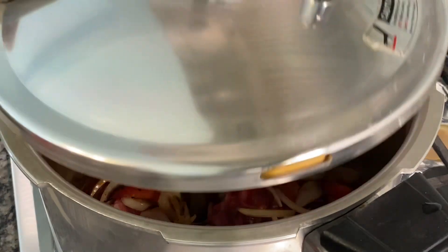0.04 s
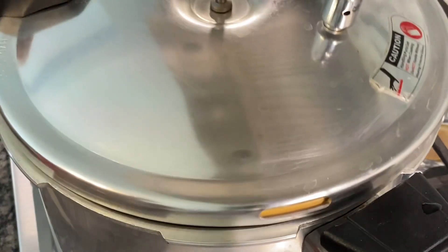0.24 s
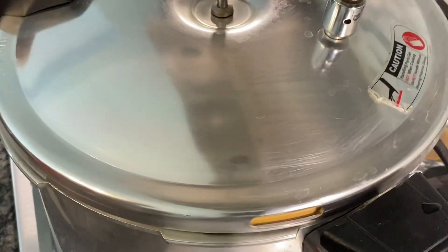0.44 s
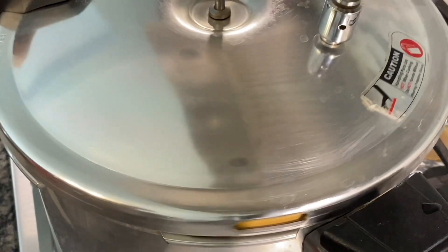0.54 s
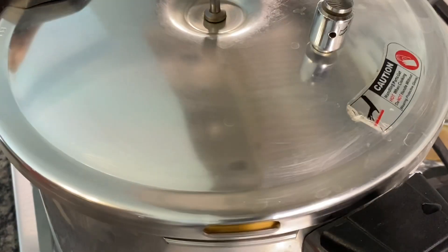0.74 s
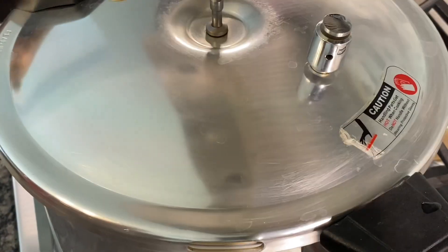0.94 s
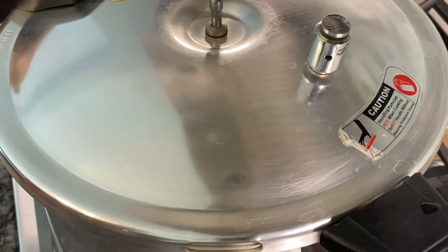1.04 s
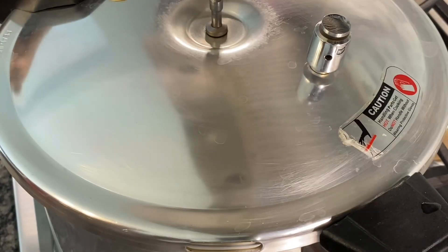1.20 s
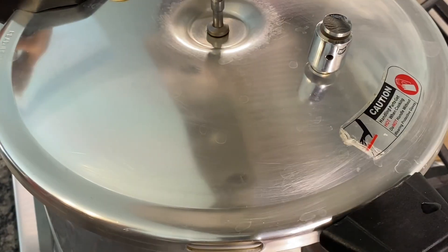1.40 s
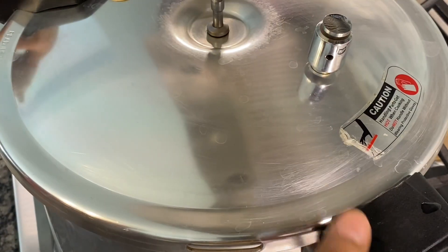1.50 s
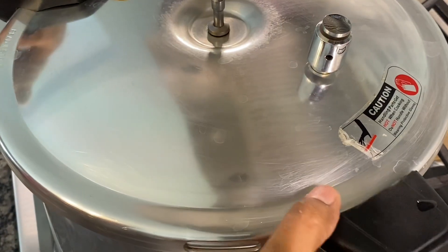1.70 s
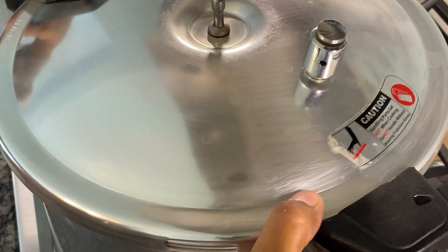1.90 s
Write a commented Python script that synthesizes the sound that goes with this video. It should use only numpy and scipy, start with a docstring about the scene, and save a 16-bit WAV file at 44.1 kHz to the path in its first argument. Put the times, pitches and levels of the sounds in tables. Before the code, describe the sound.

Close stereo pickup of a metal pot lid being closed: one hard double clank, softer knocks and sliding scrape, a cluster of clanks with low thuds, then quiet hiss and a muted knock, in a lightly reverberant kitchen.

```python
"""A heavy metal lid is set on a full pot, slid and twisted shut close to a phone in a kitchen.
The first knocks ring the lid's modes and the pot's boom; then the rim scrapes, a loose part jingles,
and further knocks come with stove-top thuds as the lid is worked shut.
Afterwards filtered noise hisses as air from the seal, a catch ticks and the locked lid is knocked again.
A diffuse room tail follows the near sounds, and low kitchen noise lies under everything."""
import sys
import numpy as np
from scipy import signal
from scipy.fft import rfft, irfft
from scipy.io import wavfile
from scipy.ndimage import uniform_filter1d

SR = 44100
rng = np.random.default_rng(int(sys.argv[2]) if len(sys.argv) > 2 else 0)


def unload_audio(sound):
    """Save the sound as a 16-bit wav file, at the path given as the first command line argument."""
    columns = np.transpose(np.atleast_2d(sound))
    # keep every value between -1 and 1, then stretch to whole-number steps
    steps = np.round(np.clip(columns, -1, 1) * 32767)
    wavfile.write(sys.argv[1], SR, steps.astype(np.int16))


N = 85995
T = np.arange(N) / SR
BLOW = np.sqrt(SR / 100)  # amplitude of a one-sample blow at 0 dB
LOCKED_S = 1.6  # from here on the lid is locked


def undb(db):
    """Decibels to gain."""
    return 10 ** (np.asarray(db, float) / 20)


def unit(x):
    """Scale to rms 1."""
    return x / np.sqrt(np.mean(x ** 2))


def curve(rows, column=1):
    """Draw one column of a table as a line in time, silent outside its ends."""
    rows = np.array(rows, float)
    return np.interp(T, rows[:, 0], rows[:, column], left=-120, right=-120)


def colour(x, points):
    """Filter by (f/Hz, level/dB) points joined along log frequency."""
    points = np.array(points, float)
    hz = np.fft.rfftfreq(x.shape[-1], 1 / SR) + 1
    level_db = np.interp(np.log(hz), np.log(points[:, 0]), points[:, 1])
    return irfft(rfft(x) * undb(level_db), x.shape[-1])


def band(x, lo_hz, hi_hz):
    """Band-pass."""
    sos = signal.butter(2, [lo_hz, min(hi_hz, .45 * SR)], "band", fs=SR, output="sos")
    return signal.sosfilt(sos, x)


def ring(x, modes):
    """Sum of exponentially decaying modes (f/Hz, level/dB, t60/s) driven by x."""
    out = 0
    for hz, db, t60 in modes:
        pole = np.exp((2j * np.pi * hz - np.log(1000) / t60) / SR)
        out = out + undb(db) * signal.lfilter([1], [1, -pole], x).imag
    return out


def linger(x, noise, t60):
    """Noise that takes up the energy of x and dies away over t60."""
    keep = np.exp(-2 * np.log(1000) / t60 / SR)
    energy = signal.lfilter([1 - keep], [1, -keep], x ** 2)
    return unit(noise) * np.sqrt(energy)


def lid():
    """Knocks and scraping drive the bands, knocks and rumble the boom, late knocks the shut note."""
    force, blows = knock_forces(scrape())
    return pot_boom() + shut_note(blows[1]) + lid_bands(force, blows)


# knocks of lid on pot: t/s, then the drive of each part: clank level/dB, boom level/dB,
# body level/dB, middle level/dB, treble level/dB; last the decay constant of the chatter/ms (0.3 at least)
KNOCKS = [(0.2406, -9, -46, -22.5, -27, -26, 2.6), (.2437, -3.5, -18, -8, -19, -21, 1.94),
          (0.361, -28, -25, -28, -28.5, -37, 4.5), (0.3988, -33.5, -26.5, -19, -34.5, -36.5, 3),
          (0.428, -39.5, -21, -25.5, -36, -45, 4.8), (0.567, -41, -22, -24.5, -30.5, -41, 4.3),
          (0.584, -40, -24.5, -20.5, -30, -41, 6), (0.5962, -37.5, -32, -24, -33.5, -52, 1.4),
          (0.6354, -12.5, -25, -21.5, -26, -25.5, 7.4), (0.654, -31, -29, -17, -32.5, -33.5, 4.7),
          (0.7634, -28, -15.5, -19.5, -28, -35, 22), (0.7717, -17.5, -19, -20, -20.5, -18, 3.7),
          (0.7745, -11.5, -16, -13, -19, -17.5, 2), (0.8, -21.5, -38, -35, -37.5, -32, 16),
          (0.8204, -5, -13, -9.5, -19.5, -13.5, 5.6), (0.8461, -13.5, -19, -41, -33.5, -27.5, 18),
          (0.8672, -12.5, -18, -34.5, -33.5, -20, 3.7), (1.6673, -15.5, -45, -45, -32.5, -28, 3.2),
          (1.683, -40, -20, -43.5, -41.5, -52, 2.4), (1.6912, -38, -33, -37.5, -32, -49, 4),
          (1.716, -55, -24.5, -61, -74, -68, 3)]
# scrape drive into body, middle, clank, treble: level/dB
SCRAPE_BANDS = [8, -1.5, -6, -4.5]
RISE_MS = .4


def knock_forces(scraping):
    """Each knock is one blow to the modes but a chattering noise burst to the cracks above the body."""
    age_ms = np.arange(SR // 20) / SR * 1000
    force = np.outer(undb(SCRAPE_BANDS), scraping)  # drives the cracks
    blows = force.copy()  # drives the modes
    for s, clank, _, body, middle, treble, decay_ms in KNOCKS:
        i = int(s * SR)
        span = slice(i, i + len(age_ms))
        shape = (1 - np.exp(-age_ms / RISE_MS)) * np.exp(-age_ms / max(decay_ms, .3))
        chatter = rng.standard_normal(len(age_ms)) * shape
        chatter *= BLOW / np.sqrt(np.sum(chatter ** 2))  # same energy as a blow
        force[1:, span] += np.outer(undb([middle, clank, treble]), chatter)
        force[0, i] += undb(body) * BLOW
        blows[:, i + int(RISE_MS * SR / 1000)] += undb([body, middle, clank, treble]) * BLOW
    return force, blows


# modes of lid and pot, one table a band: f/Hz, level/dB, t60/s
BODY = [(178, -3, .16), (200, 4, .09), (258, 0, .06)]
MIDDLE = [(445, -10, .15), (520, -10, .12), (797, -8, .25), (1027, -8, .2), (1213, -10, .2), (1307, -8, .2),
          (1485, -9, .35)]
CLANK = [(2090, -5, .12), (2345, -1, .09), (2640, -3, .12), (3006, -5, .11), (3115, -3, .12),
         (3580, -2, .08)]
TREBLE = [(4800, -9, .08), (5750, -5, .09), (6850, -4, .08)]
# broad crack of each band: low f/Hz, high f/Hz, crack level/dB against the modes, whole band level/dB
CRACKS = [(135.5, 343, -11.5, -1), (313, 1915, -2, 1), (1616, 3630, -2, -13.5), (4170, 9460, -8, -8.5)]
# wash of many small modes in each band: level/dB
WASH_LEVELS = [-15.5, -6, -3, -4.5]
# decay of that wash in each band: t60/s
WASH_DECAYS = [0.027, 0.1, 0.045, 0.033]
LOCKED_DB = -7  # the locked lid rings less
FLUTTER = .55  # rms depth, as a share of the ringing
AIR_HZ, AIR_DB = 8900, -22.5  # top of the crack, from the treble force


def lid_bands(force, blows):
    """Each band adds fluttering modes, a broad crack and a wash of dense small modes."""
    free = undb(LOCKED_DB * (T > LOCKED_S))
    bands = zip(force, blows, (BODY, MIDDLE, CLANK, TREBLE), CRACKS, WASH_LEVELS, WASH_DECAYS)
    out = np.zeros(N)
    for push, blow, modes, (lo, hi, crack_db, band_db), wash_db, wash_t60 in bands:
        crack = band(push, lo, hi) * np.sqrt(SR / 2 / (hi - lo))
        wash = linger(crack * free, band(rng.standard_normal(N), lo, hi), wash_t60)
        flutter = 1 + FLUTTER * unit(band(rng.standard_normal(N), 5.5, 75))
        rings = band(ring(blow * free, modes) * flutter, lo, hi) / (np.sqrt(len(modes)) * BLOW)
        out += undb(band_db) * (rings + undb(crack_db) * crack + undb(wash_db) * wash)
    return out + undb(AIR_DB) * band(force[3], AIR_HZ, 13000)


# note of the shut pot: f/Hz, level/dB, t60/s
SHUT_MODES = [(441, 0, .13), (470, -5, .08)]


def shut_note(middle_blows):
    """The knocks after locking ring the shut pot on a note of its own."""
    return ring(middle_blows * (T > LOCKED_S), SHUT_MODES) / BLOW


# rim sliding: t/s, scrape level/dB, rumble drive level/dB
SLIDE = [(.243, -49, -40), (.30, -63, -38), (.40, -50, -48), (.48, -48, -30), (.55, -48, -24),
         (.6, -45, -34.5), (.72, -52.5, -13), (.84, -49.5, -32), (.92, -60, -29.5), (1.08, -57, -25),
         (1.15, -74, -84.5)]
SCRAPE_PER_S, SCRAPE_SPREAD_DB = 2100, 0.5  # mean click rate, spread of click levels


def scrape():
    """The sliding rim catches in a dense random rain of clicks."""
    caught = rng.random(N) < SCRAPE_PER_S / SR
    sizes = undb(SCRAPE_SPREAD_DB * rng.standard_normal(N))
    return unit(rng.standard_normal(N) * caught * sizes) * undb(curve(SLIDE))


# boom of the full pot: centre f/Hz, level/dB, t60/s before locking
BOOM = [(107.5, 1, 0.18)]
BOOM_KEPT, BOOM_SHIFT = .45, .025  # share that survives a knock; relative pitch spread
LOCKED_BOOM_T60_S = .08


def pot_boom():
    """One low mode: every knock partly damps it, and its pitch varies at random from knock to knock."""
    drive = rng.standard_normal(N) * undb(curve(SLIDE, column=2)) / 70
    for s, _, boom_db, *_ in KNOCKS:
        drive[int(s * SR)] += undb(boom_db)
    hz, db, free_t60 = BOOM[0]
    cuts = [0] + [int(knock[0] * SR) for knock in KNOCKS] + [N]
    out, state = np.zeros(N), np.zeros(1, complex)
    for start, end in zip(cuts, cuts[1:]):
        boom_hz = hz * (1 + BOOM_SHIFT * rng.standard_normal())
        t60 = free_t60 if start < LOCKED_S * SR else LOCKED_BOOM_T60_S
        pole = np.exp((2j * np.pi * boom_hz - np.log(1000) / t60) / SR)
        kept = state * BOOM_KEPT
        y, state = signal.lfilter([1], [1, -pole], drive[start:end].astype(complex), zi=kept)
        out[start:end] = y.imag
    return band(out * undb(db), 60, 230)


# thuds of the stove top: t/s, level/dB
THUDS = [(0.669, -27.5), (0.783, -42), (0.847, -23.5), (1.688, -40)]
THUD_HZ, THUD_T60_S = 62.2, 0.49


def stove_thuds():
    """Impulses ring the stove top's single low mode."""
    hits = np.zeros(N)
    for s, db in THUDS:
        hits[int(s * SR)] = undb(db)
    return ring(hits, [(THUD_HZ, 0, THUD_T60_S)])


# mode of the catch: f/Hz, level/dB, t60/s
TICK_MODES = [(1940, 10, 0.016)]
TICK_S, TICK_DB = 1.629, -51  # time and drive level


def catch_tick():
    """One impulse rings the catch's short mode."""
    hit = np.zeros(N)
    hit[int(TICK_S * SR)] = undb(TICK_DB)
    return ring(hit, TICK_MODES)


# shakes of a loose part on the lid: t/s, drive level/dB
JINGLES = [(0.43, -43), (.458, -46), (.503, -40), (0.573, -35), (.596, -32.5)]
# its two bright modes: f/Hz, level/dB, t60/s
JINGLE_MODES = [(3590, -8, .07), (2900, -9, 0.048)]
SHAKE_MS = 9.8  # decay constant


def jingle():
    """Abrupt, dying shakes of noise ring the loose part's modes."""
    shake = np.zeros(N)
    for s, db in JINGLES:
        shake += undb(db) * (T > s) * np.exp(-np.abs(T - s) * 1000 / SHAKE_MS)
    return ring(shake * rng.standard_normal(N), JINGLE_MODES) / 10


# air from the seal: t/s, level/dB
HISS = [(1.262, -74), (1.27, -51.5), (1.42, -59), (1.5, -67), (1.525, -64), (1.61, -70.5), (1.72, -65.5),
        (1.95, -62.5)]
# tone of the hiss: f/Hz, level/dB
HISS_COLOUR = [(900, -3.5), (1700, 6), (4400, 6.5), (7200, 9), (10600, 11), (14500, 2.5)]
FLICKER_DB = 1.16  # rms


def hiss():
    """Coloured noise of escaping air, its level flickering."""
    flicker = unit(uniform_filter1d(rng.standard_normal(N), size=500))
    air = unit(colour(rng.standard_normal(N), HISS_COLOUR))
    return air * undb(curve(HISS) + FLICKER_DB * flicker)


# tail of the room by band: centre f/Hz, t60/s, level/dB
ROOM = [(163, 0.28, -4.5), (400, 0.58, -6), (900, 0.72, -12), (2140, 0.61, -13.5), (6300, 0.94, -24.5),
        (12170, 0.4, -12)]


def room(x):
    """Diffuse tail: x convolved with noise bands, each with its own decay."""
    tail = 0
    for hz, t60, db in ROOM:
        decay = np.exp(-np.log(1000) * T[:SR] / t60)
        noise = band(rng.standard_normal((2, SR)), hz / 1.715, hz * 1.604) * decay
        tail = tail + noise * undb(db) * np.sqrt(2 * np.log(1000) / t60 / SR)
    return wide(signal.fftconvolve(x[None], tail, axes=1)[:, :N])


# tone of the kitchen's background: f/Hz, level/dB
KITCHEN_COLOUR = [(25, -5), (107, 8.5), (159, -4.5), (247, -1.5), (308, -13.5), (414, -8), (504, -11.5),
                  (678, -19.5), (9000, -53), (11700, -101)]
KITCHEN_DB = -53.5


def kitchen():
    """Steady low background: coloured noise spread in stereo."""
    return wide(unit(colour(rng.standard_normal((2, N)), KITCHEN_COLOUR)) * undb(KITCHEN_DB))


# filter of the diffuse side signal: f/Hz, level/dB
WIDTH = [(60, -19), (200, -14), (400, -6.5), (800, 0.5), (1500, 2.5), (2400, -15.5), (5000, -34)]


def wide(x):
    """Diffuse stereo from a mid and an unrelated side signal."""
    side = colour(x[1], WIDTH)
    return np.array([x[0] + side, x[0] - side])


def scene():
    """Near sounds with their room tail, the dry hiss and the kitchen's background."""
    near = lid() + stove_thuds() + catch_tick() + jingle()
    return near + hiss() + room(near) + kitchen()


PORT_FROM_HZ, PORT_LAG_MS = 7060, 0.31  # left port late above this
LEAD_HZ, LEAD_RAD = 3500, 0.51  # left port early around this
LEAN_HZ, LOW_LEAN_DB = 300, -3  # left against right in the bass
RUMBLE_CUT_HZ, TOP_HZ = 42, 15700


def record(dry):
    """Two ports: high treble reaches the left late, low treble early; bass leans right; ends are cut."""
    hz = np.fft.rfftfreq(N, 1 / SR)
    lag = np.pi * PORT_LAG_MS / 1000 * np.maximum(hz - PORT_FROM_HZ, 0)
    lead = LEAD_RAD / 2 * np.exp(-2 * np.log(hz / LEAD_HZ + 1e-9) ** 2 / 0.29)
    lean_db = LOW_LEAN_DB / 2 / (1 + (hz / LEAN_HZ) ** 2)
    sign = np.array([[1], [-1]])  # left, right
    out = irfft(rfft(dry) * undb(sign * lean_db) * np.exp(-1j * sign * (lag - lead)), N)
    out = signal.sosfilt(signal.butter(2, RUMBLE_CUT_HZ, "high", fs=SR, output="sos"), out)
    return signal.sosfilt(signal.ellip(10, .2, 80, TOP_HZ, fs=SR, output="sos"), out)


dry = scene()
out = record(dry)
unload_audio(out)
```